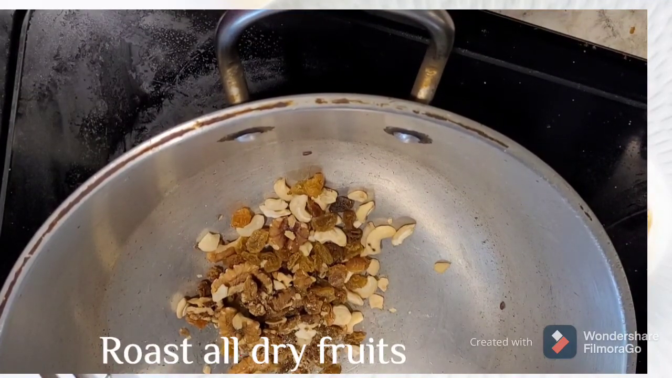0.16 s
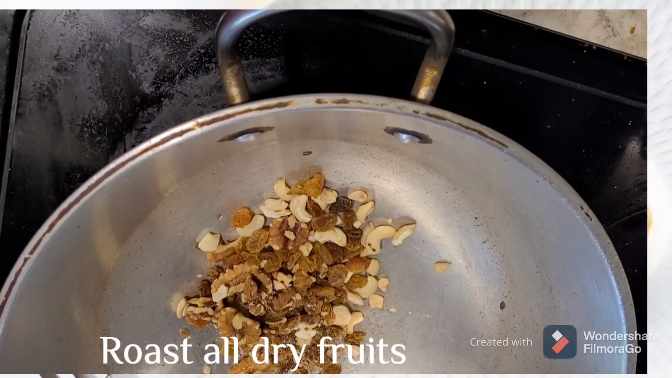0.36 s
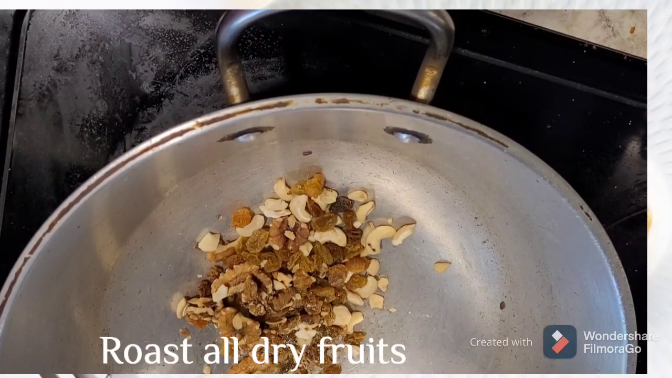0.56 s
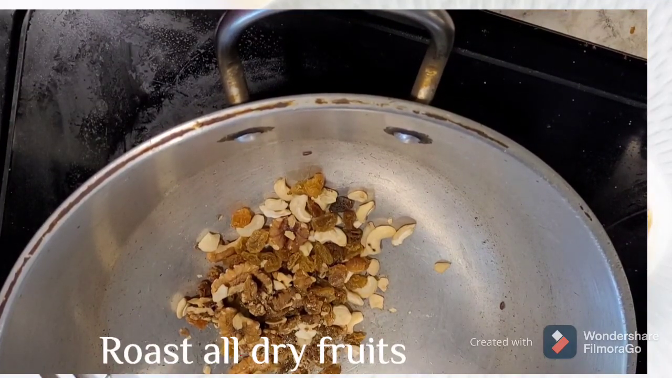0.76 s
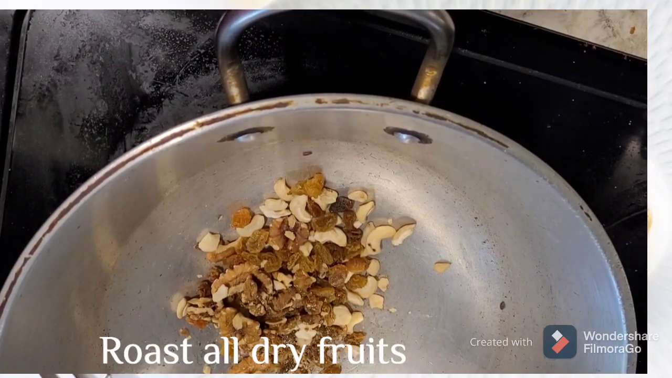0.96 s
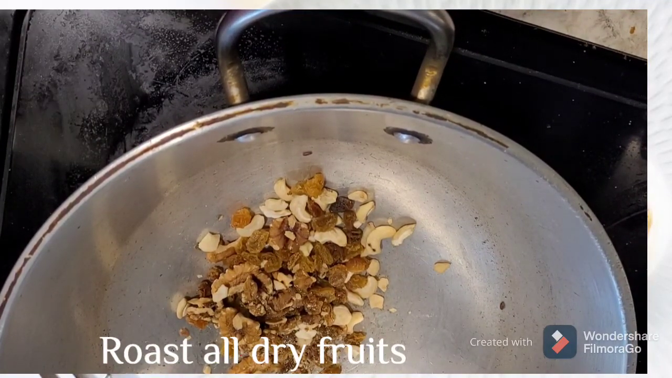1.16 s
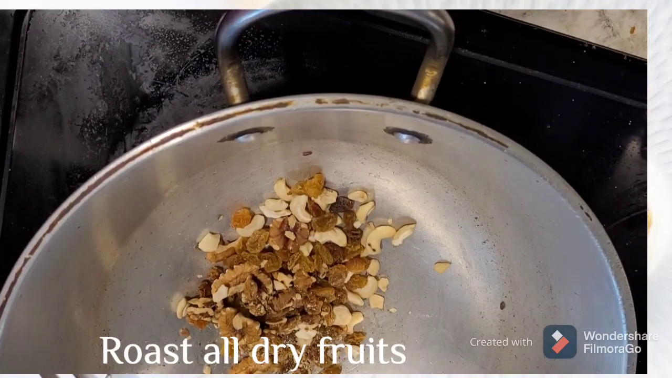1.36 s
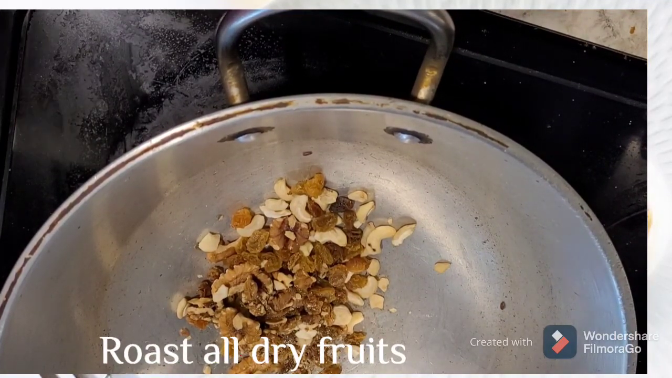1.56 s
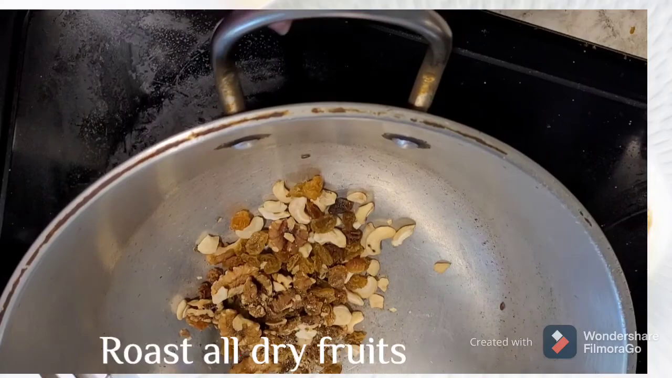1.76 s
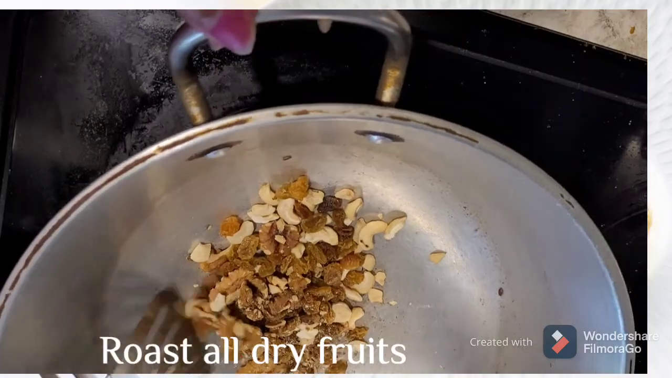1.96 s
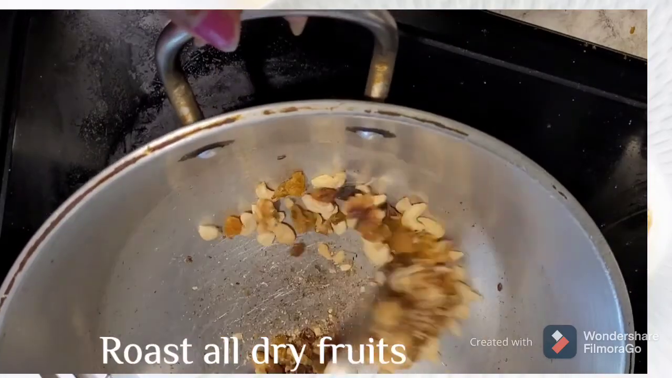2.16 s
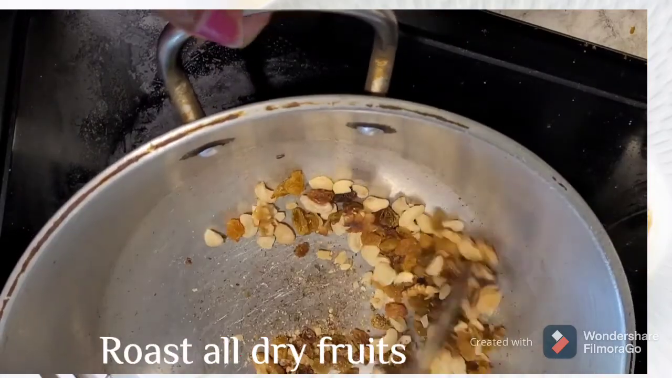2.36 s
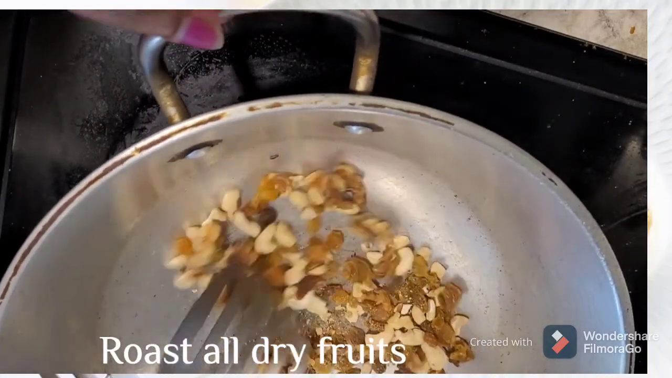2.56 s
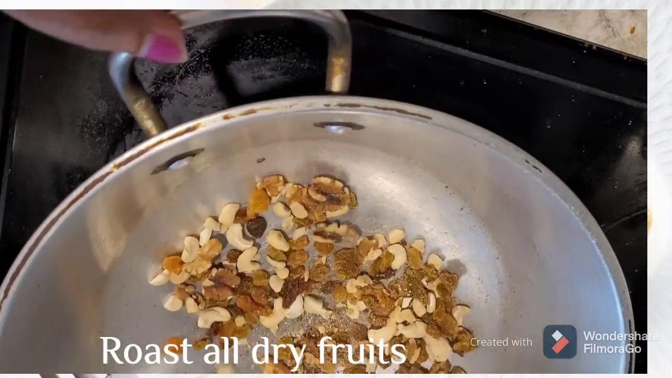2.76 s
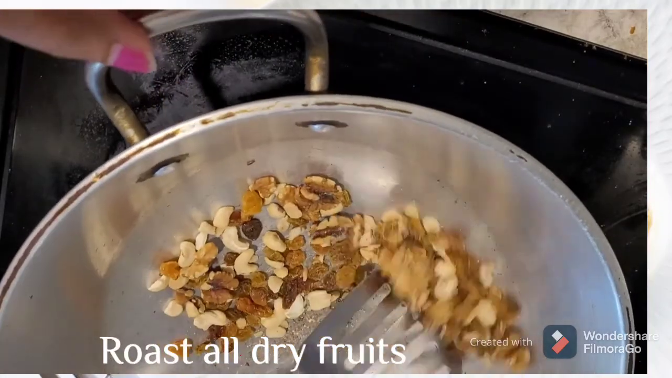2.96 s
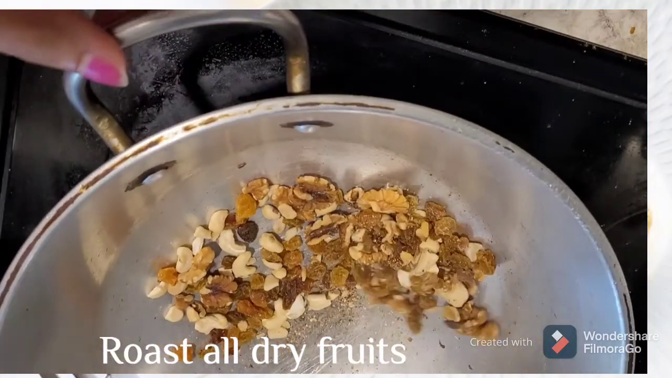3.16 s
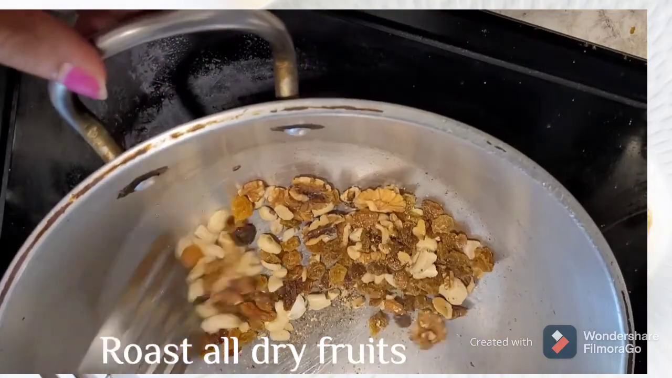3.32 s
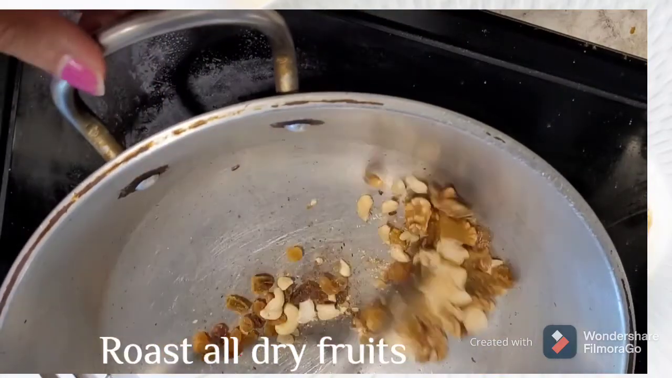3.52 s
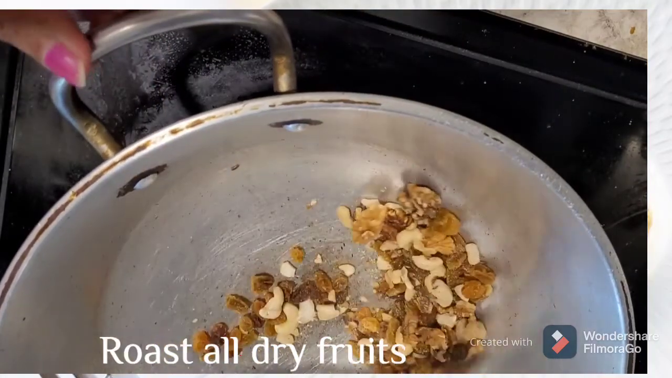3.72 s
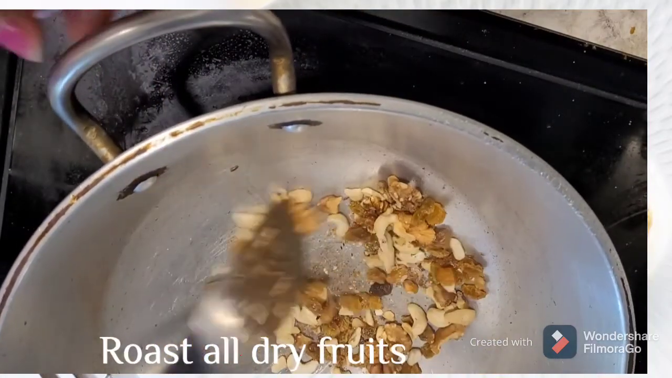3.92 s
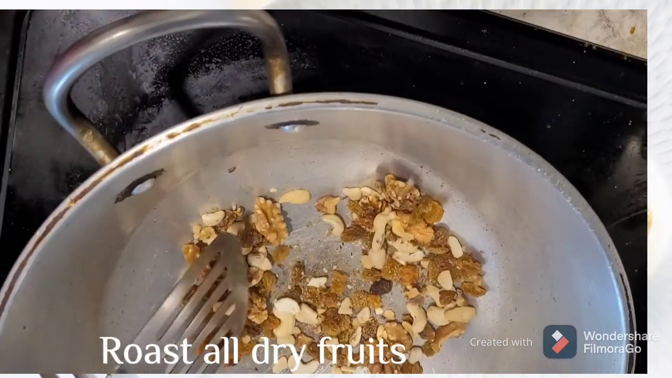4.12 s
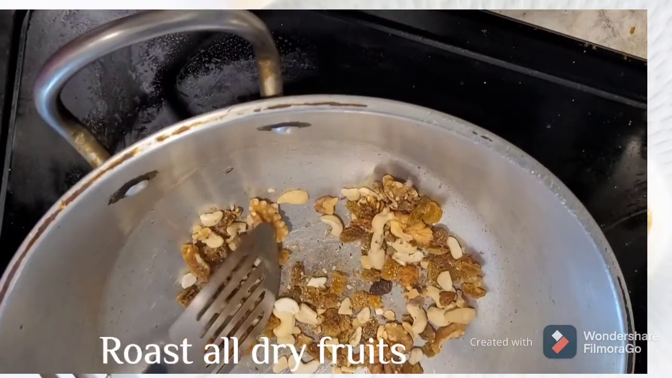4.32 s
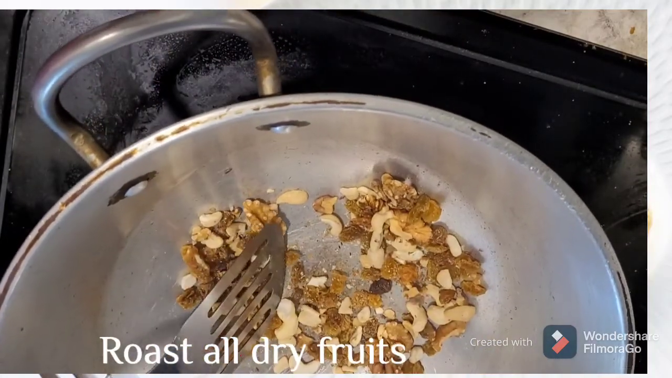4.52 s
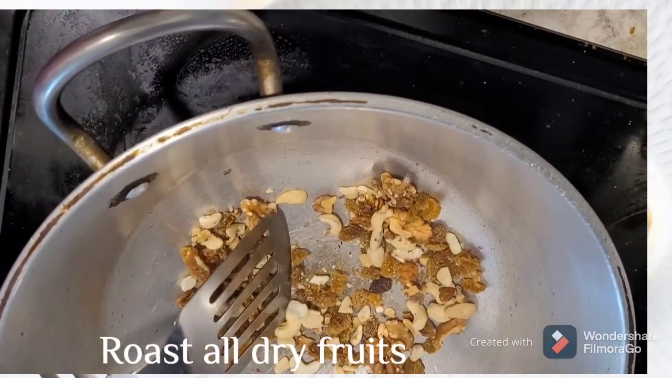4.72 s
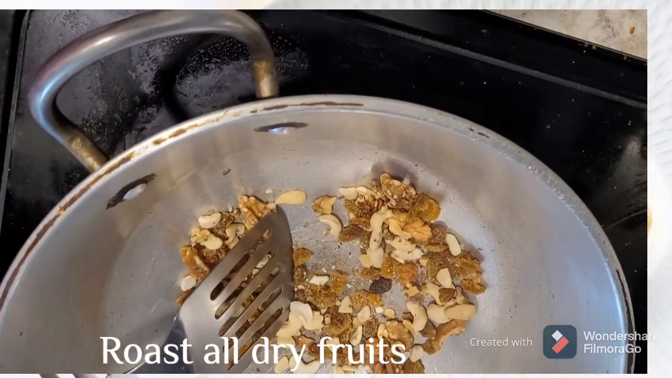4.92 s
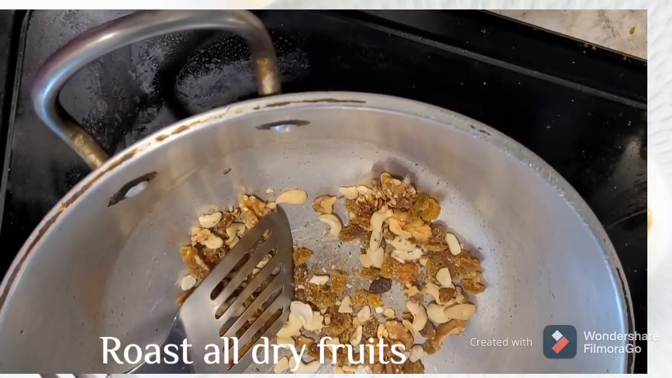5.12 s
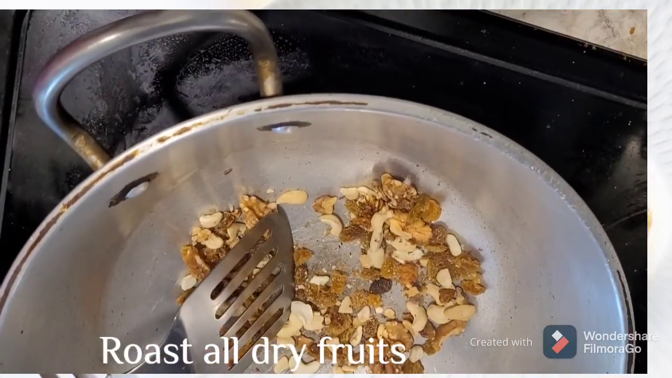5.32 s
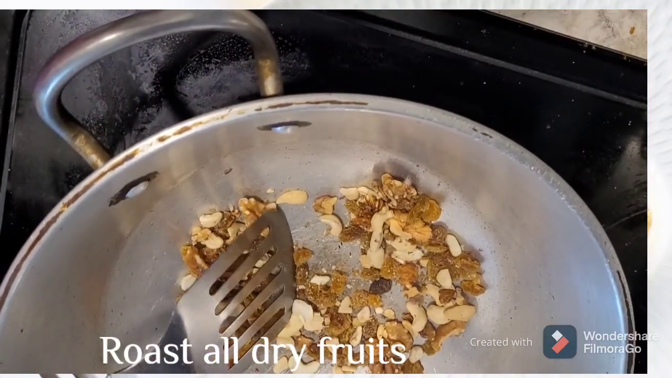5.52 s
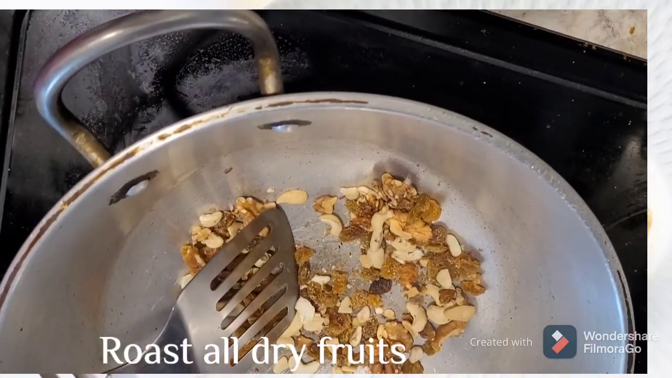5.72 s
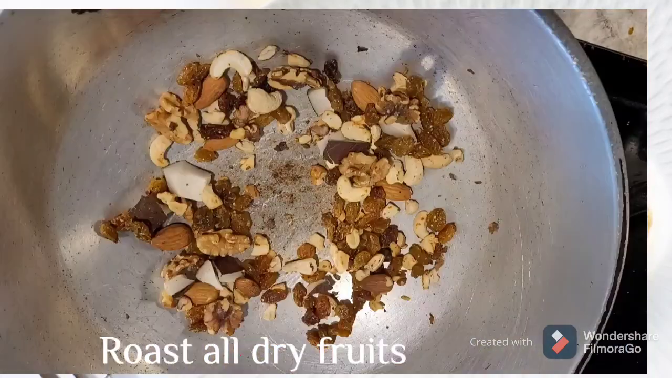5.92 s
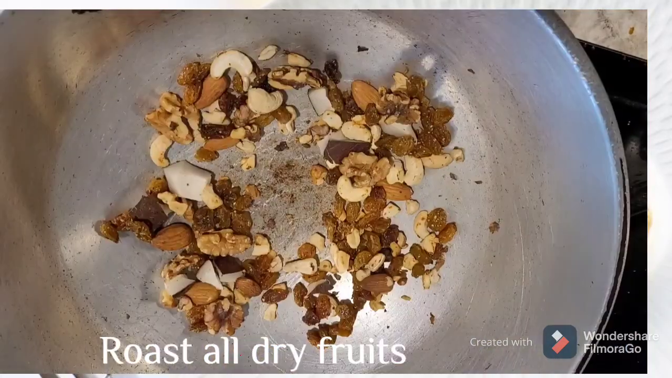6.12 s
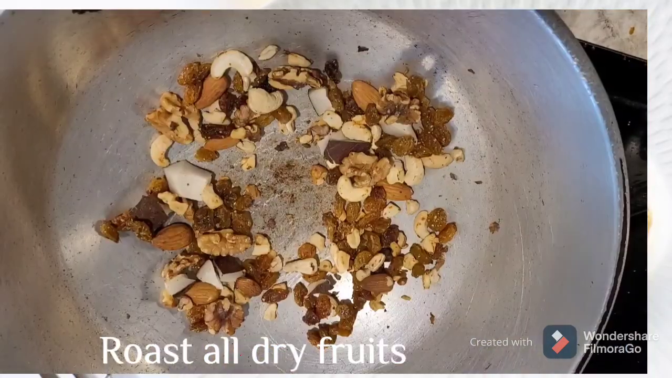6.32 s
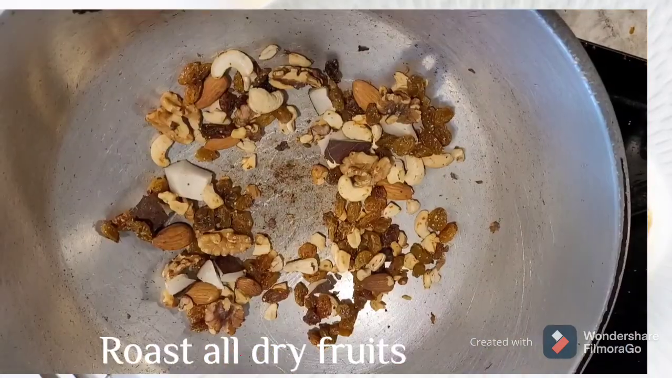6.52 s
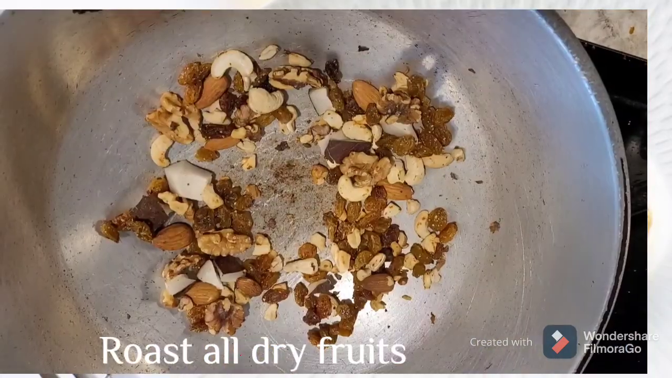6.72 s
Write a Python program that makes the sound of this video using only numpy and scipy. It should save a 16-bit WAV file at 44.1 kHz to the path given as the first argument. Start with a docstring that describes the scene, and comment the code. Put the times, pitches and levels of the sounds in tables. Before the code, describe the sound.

A home kitchen hob, heard close in stereo, with a soft rush of air, a low slightly wavering hum and very faint sizzle throughout. From 0 to 1.3 seconds, a few small groups of dull, hollow, roomy knocks. At 2.0 a metal spatula lands in the steel pan with a loud bright double clank, then a short rasp and squeak; nuts patter softly and the sizzle grows livelier. A softer drag follows from 2.2. At 2.8 another clank and the strongest harsh scrape, with a brief squeal; at 3.25 a third clank, more scraping and gliding squeaks until 3.5. Gentle scraping and light quick taps continue to about 4.1. Isolated dull taps fall at 4.5, 4.8, 5.0 and 5.4. The sizzle fades, with a dry click at 5.25, then tiny close clicks and a soft bump mostly on the right from 6.0 to 6.75.

```python
"""A kitchen hob: nuts and dried fruit roast in a steel pan, over a soft rush of air and a low hum.
A metal spatula gives a few dull knocks as it is picked up, clanks loudly into the pan three times among
lighter taps, and scrapes through the nuts, which patter and sizzle; small dry clicks follow close by.
Blows are rebounding impulses through noise bursts and decaying modes; scrapes are random stick-slip
impulses through the blade's response; squeaks are gliding tones; sizzle and air are coloured noise."""
import sys
import numpy as np
from scipy import signal
from scipy.fft import rfft, irfft
from scipy.io import wavfile

SR = 44100
rng = np.random.default_rng(int(sys.argv[2]) if len(sys.argv) > 2 else 0)


def dump(signal):
    """Clip the signal to [-1, 1] and save it as 16-bit WAV at the path in sys.argv[1]."""
    limited = np.clip(np.atleast_2d(signal).T, -1, 1)
    pcm = np.round(limited * 32767).astype(np.int16)
    wavfile.write(sys.argv[1], SR, pcm)


N = 303452
TIME = np.arange(N) / SR   # s
AGE = TIME[:SR // 2]   # s since a contact, for as long as its sound is computed

# Strokes of the blade through the nuts: (start [s], swell [s], hold [s], friction before trim [dB],
# lower rasp at the end of the push over friction [dB], nuts before trim [dB])
STROKE_LIST = [(2.009, .075, 0.039, -34, 9.5, -45.5), (2.196, 0.22, 0.361, -54, 7, -46),
               (2.786, 0.099, 0.044, -23.5, 0.5, -40), (3.28, 0.11, 0.013, -27, -16, -37.5),
               (3.413, 0.061, 0.0085, -33.5, 7, -56), (3.573, 0.14, 0.328, -59, 11, -43),
               (4.055, 0.016, 0.0039, -52.5, 11, -70)]
# Broad rasp of the blade pressed on steel: (frequency [Hz], relative density [dB per Hz])
RASP_COLOUR = [(200, -21.5), (600, -3.5), (1200, -15.5), (1800, -11.5), (3200, 1), (6000, -1.5),
               (8000, -7.5), (10000, -9.5), (16000, -23)]
# Stereo likeness: (frequency [Hz], left-right correlation [-1 to 1])
STEREO_LIKENESS = [(60, 0.73), (130, 0.99), (300, 0.89), (650, 0.38), (1300, -0.15), (3000, 0.031)]


def from_db(db):
    """Decibels to gain."""
    return 10 ** (np.asarray(db) / 20)


def rms_one(x):
    """Scale to rms 1 over all channels."""
    return x / np.sqrt(np.mean(x ** 2) + 1e-20)


def energy_one(x):
    """Scale to unit energy, averaged over the channels."""
    return rms_one(x) / np.sqrt(x.shape[-1])


def level_over_time(points):
    """Draw a level curve straight between its points, at every sample."""
    seconds, db = np.transpose(points)
    return np.interp(TIME, seconds, db)


def at_hz(points, hz):
    """Read a spectrum on a log-frequency axis."""
    f, value = np.transpose(points)
    return np.interp(np.log(hz + 1e-9), np.log(f), value)


def slope(hz, per_octave, pivot_hz=1000):
    """Tilt in dB above the pivot, flat below it; a harder contact lifts the treble."""
    return per_octave * np.log2(np.maximum(hz, pivot_hz) / pivot_hz)


def dying(t60):
    """Exponential decay that falls by 60 dB in t60 seconds."""
    return np.exp(-np.log(1000) * AGE / t60)


def drift(rate_hz):
    """Smooth random wander of rms 1, made by low-passing noise."""
    hz = np.fft.rfftfreq(N, 1 / SR)
    return rms_one(irfft(rfft(rng.standard_normal(N)) / (1 + (hz / rate_hz) ** 2), N))


def noise(colour, size, weight=np.zeros_like):
    """Coloured stereo noise, its channels much alike in the bass and nearly unrelated in the treble."""
    hz = np.fft.rfftfreq(size, 1 / SR)
    mid, side = rfft(rng.standard_normal((2, size)))
    alike = at_hz(STEREO_LIKENESS, hz)
    both = np.sqrt(1 + alike) * mid + np.sqrt(1 - alike) * side * [[1], [-1]]
    return rms_one(irfft(both * from_db(at_hz(colour, hz) + weight(hz)), size))


def ring(modes, weight=np.zeros_like, detune=0):
    """Decaying modes, with new random strengths at every contact and a phase gap between the channels."""
    out = 0
    for hz, db, t60 in modes:
        # the less alike the channels are at this pitch, the further apart in phase
        apart = np.arccos(at_hz(STEREO_LIKENESS, hz)) * rng.choice([-.5, .5])
        pitch = hz * (1 + detune * rng.standard_normal())
        swing = np.exp(2j * np.pi * (pitch * AGE + rng.random())) * dying(t60)
        gain = from_db(db + weight(hz) + 2 * rng.standard_normal())
        out = out + gain * np.real(swing * np.exp(1j * apart * np.array([[1], [-1]])))
    return energy_one(out)


def wash(colour, crack_t60, tail_db, tail_t60, weight=np.zeros_like):
    """A contact's crack in noise, then the tail of crowded modes and kitchen walls."""
    envelope = dying(crack_t60) + from_db(tail_db) * dying(tail_t60)
    return energy_one(noise(colour, len(AGE), weight) * envelope)


def grains(per_s, spread_db):
    """Tiny contacts at random moments, of uneven size; rms 1."""
    sizes = from_db(spread_db * np.minimum(rng.exponential(1, N), 4))
    signed = sizes * rng.choice([-1, 1], N)
    return rms_one(signed * (rng.random(N) < per_s / SR))


def chatter(length, count=7):
    """A first contact and its quick, weakening rebounds."""
    force = np.zeros(int(length * SR) + 2)
    when = np.append(0, (np.arange(count) + rng.random(count)) / count)
    force[(when * (len(force) - 1)).astype(int)] = np.exp(-when) * rng.choice([-1, 1], count + 1)
    return energy_one(force)


def excite(force, response):
    """Play a force through a stereo response."""
    return signal.fftconvolve(force[None], response, axes=1)[:, :N]


def add(out, s, sound):
    """Mix a sound in at a time in seconds."""
    start = int(s * SR)
    out[:, start:start + sound.shape[1]] += sound[:, :N - start]


def contact(bright, spot_hz, spot_db=6):
    """Weight in dB of each frequency in one blow: its hardness, and the modes near the spot struck."""
    def weight(hz):
        octaves_off = np.log2((hz + 1) / spot_hz)
        return slope(hz, bright, pivot_hz=3000) + spot_db * np.exp(-(octaves_off / .18) ** 2)
    return weight


def blow(db, length, crack, modes):
    """One blow: the crack repeats with each rebound while the modes swell and ring on."""
    swell = 1 - np.exp(-2 * AGE / length)
    rebounds = excite(chatter(length), crack)[:, :len(AGE)]
    return from_db(db) * np.sqrt(SR) * (rebounds + modes * swell)


def strikes(ring_db=-1, low_ring_db=0, level_db=-1, muffle=0.8):
    """The spatula lands: the steel clangs, the wall knocks and the whole pan gives a low thud."""
    # Spatula meets pan: (time [s], clang before trim [dB], hollow knock before trim [dB],
    # brightness [dB per octave], frequency favoured by the spot struck [Hz], chatter length [s])
    strike_list = [(1.982, -30.5, -52.5, -1, 4900, 0.0082), (1.993, -33.5, -53.5, -3.5, 4800, 0.0084),
                   (2.072, -49.5, -64, -15, 4600, 0.0068), (2.299, -54, -72, -5.5, 6360, 0.023),
                   (2.778, -36.5, -58, -2, 6700, 0.0091), (3.2452, -33.5, -57, -4, 6250, 0.0087),
                   (3.693, -56, -65, -12, 4670, .004), (3.73, -51, -63, -7, 5300, .012),
                   (3.794, -52, -72, -3.5, 6050, 0.0055), (3.827, -57.5, -82, -8, 7000, 0.0039),
                   (3.861, -55, -78, -6.5, 6660, .015), (4.084, -58.5, -82, -15, 3180, 0.0028),
                   (4.523, -53.5, -52.5, -10, 4760, 0.0093), (4.796, -58, -57, -19, 5000, .008),
                   (5.028, -50.5, -55, -8, 5000, .005), (5.412, -56, -62, -10, 4800, .003)]
    # Bright ring of the steel: (frequency [Hz], relative level before chance [dB], t60 [s])
    pan_modes = [(2322, -6.5, 0.19), (2430, -41, 0.083), (3170, -16, 0.34), (3500, -16.5, 0.34),
                 (4620, 11, 0.083), (4800, -7.5, 0.09), (4958, -17, 0.13), (5090, -23.5, 0.22),
                 (5380, -22.5, .18), (5930, 2, 0.15), (6250, -11.5, .16), (6480, -34.5, .13),
                 (6830, 8.5, 0.11), (7080, 7, 0.12), (7580, -2, .22), (7843, 7, 0.099), (8550, -8, 0.3),
                 (8960, -13.5, 0.31), (9250, -38.5, 0.11), (9700, -35, 0.12), (10800, 10.5, 0.07)]
    # Dense short-lived modes of the steel: (frequency [Hz], relative density [dB per Hz])
    clank_colour = [(600, -19), (1900, -18.5), (2400, -9), (3000, -9.5), (3900, -14.5), (4700, 5.5),
                    (5300, 1), (6000, 0.5), (7700, 2), (10000, -3), (16000, -7.5)]
    # Hollow knock of the pan's wall: (frequency [Hz], relative density [dB per Hz])
    hollow_colour = [(300, -17), (620, -1), (800, -23.5), (1120, 9.5), (1350, -1.5), (1700, 0),
                     (2000, -9.5), (3000, -32.5), (5000, -25), (16000, -47)]
    # Low modes of the jolted pan: (frequency [Hz], relative level before chance [dB], t60 [s])
    thud_modes = [(142.7, 1, 0.57), (227, -1, 0.31), (290, -11, 0.051), (335, -10.5, 0.18)]
    # Dull body of the jolted pan: (frequency [Hz], relative density [dB per Hz])
    thud_colour = [(90, -22), (140, 4.5), (230, -7.5), (330, 5), (450, -15), (620, -2), (900, -13),
                   (4000, -45)]
    # thud over knock at a middling clang, and its growth in dB per dB of clang
    thud_over_knock_db, middling_clang_db, thud_growth = 0.5, -47.5, 0.29
    out = np.zeros((2, N))
    for s, clang_db, knock_db, bright, spot_hz, length in strike_list:
        # a heavier blow jolts the whole pan more
        thud_db = knock_db + thud_over_knock_db + thud_growth * (clang_db - middling_clang_db)
        weight = contact(bright, spot_hz)
        crack = wash(clank_colour, crack_t60=0.023, tail_db=-12, tail_t60=0.33, weight=weight)
        # a soft landing among the nuts also damps the ring
        steel = from_db(ring_db + muffle * min(bright, 0)) * ring(pan_modes, weight)
        add(out, s, blow(clang_db + level_db, length, crack, steel))
        wall = wash(hollow_colour, crack_t60=.04, tail_db=-8, tail_t60=.22)
        add(out, s, blow(knock_db + level_db, length, wall, 0))
        body = wash(thud_colour, crack_t60=0.079, tail_db=1.0, tail_t60=0.51)
        low_ring = from_db(low_ring_db) * ring(thud_modes)
        add(out, s, blow(thud_db + level_db, length, body, low_ring))
    return out


def stroke(start, swell, hold, power, release_db_per_s):
    """Gain of one push: it swells from almost nothing, holds and dies away."""
    age = TIME - start
    rise = np.clip(age / swell, 1e-6, 1) ** power
    return rise * from_db(-release_db_per_s * np.maximum(age - swell - hold, 0))


def blade_pressure():
    """Friction of all strokes, and that of their lower rasp, which grows as the blade climbs the wall."""
    bite_growth_db = 11.5   # over one stroke
    friction, bite = 0, 0
    for start, swell, hold, db, bite_db, _ in STROKE_LIST:
        push = from_db(db) * stroke(start, swell, hold, power=2, release_db_per_s=230)
        to_go = np.clip(1 - (TIME - start) / (swell + hold), 0, 1)
        friction = np.hypot(friction, push)
        bite = np.hypot(bite, push * from_db(bite_db - bite_growth_db * to_go))
    return friction, bite


def scraping(ring_db=3, level_db=-3, split_hz=4000, wander_db=9, count=4):
    """The edge sticks and slips over the steel; as it travels, one touching spot takes over from another."""
    # The blade pressed on steel: (frequency before detuning [Hz], relative level before chance [dB], t60 [s])
    blade_modes = [(2115, -11, 0.11), (2970, -1, 0.033), (3400, -5.5, 0.051), (3530, -2.5, 0.083),
                   (3800, -25, 0.066), (4507, 2.5, 0.077), (4620, -5.5, 0.17), (4740, -5, 0.11),
                   (5725, 4.5, 0.048), (5970, -3, 0.061), (7160, -11.5, 0.0705), (7260, 6.5, 0.0213),
                   (7840, -1.5, 0.066), (8540, -12, .12)]
    friction, bite = blade_pressure()
    share = np.array([from_db(wander_db * drift(rate_hz=11.5)) for _ in range(count)])
    share = share / np.sqrt(np.sum(share ** 2, axis=0))   # the spots share a constant power
    push = from_db(level_db + 0.6 * drift(rate_hz=61))
    low_pass = signal.butter(4, split_hz, fs=SR, output="sos")
    out = 0
    for spot in share:
        slips = grains(per_s=650, spread_db=3.6) * push * spot
        low = signal.sosfiltfilt(low_pass, slips)
        force = (slips - low) * friction + low * bite
        # each spot loads the blade a little differently
        rasp = wash(RASP_COLOUR, crack_t60=.018, tail_db=-13, tail_t60=.23)
        blade = rasp + from_db(ring_db) * ring(blade_modes, detune=0.0137)
        out = out + excite(force, blade)
    return out


def squeaks(jitter=0.0204, overtone_db=-7, level_db=-1):
    """The edge sticks and sings: slips fall into step in a rough, gliding tone with overtones."""
    # Singing moments: (start [s], length [s], start pitch before jitter [Hz],
    # end pitch before jitter [Hz], level before trim [dB])
    squeak_list = [(2.057, 0.064, 4700, 4445, -40.5), (2.885, 0.037, 5980, 5590, -35),
                   (2.93, 0.043, 3410, 3470, -34), (3.327, 0.068, 2390, 2270, -47),
                   (3.36, 0.068, 1434, 1695, -44.5), (3.388, .05, 1770, 2280, -48),
                   (3.435, 0.093, 3334, 3554, -44), (4.082, 0.052, 3230, 3170, -50)]
    force = np.zeros(N)
    waver = 1 + jitter * drift(rate_hz=226)
    for s, length, start_hz, end_hz, db in squeak_list:
        span = np.flatnonzero((TIME >= s) & (TIME < s + length))
        pitch = np.linspace(start_hz, end_hz, len(span)) * waver[span]
        phase = 2 * np.pi * np.cumsum(pitch) / SR
        tone = sum(from_db(overtone_db * k) * np.sin((k + 1) * phase) for k in range(4))
        swell = np.sin(np.linspace(0, np.pi, len(span)))
        force[span] += from_db(db + level_db) * np.sqrt(2) * tone * swell
    rasp = wash(RASP_COLOUR, crack_t60=.02, tail_db=-20, tail_t60=0.29)
    return force + from_db(1.5) * excite(force, rasp)


def nuts(level_db=-1):
    """Pushed nuts patter softly on pan and each other, moving at the first push and settling slowly."""
    # Soft contacts heard through the pan: (frequency [Hz], relative density [dB per Hz])
    nut_colour = [(105, -27), (145, 9.5), (190, -29.5), (300, 5), (500, -9), (800, -3), (1150, 1),
                  (1600, -10), (3200, -18.5), (7000, -9), (16000, -44.5)]
    pushes = []
    for start, swell, *_, db in STROKE_LIST:
        motion = stroke(start, swell, hold=0, power=1.4, release_db_per_s=61)
        pushes.append(from_db(db + level_db) * motion)
    tumble = np.hypot.reduce(pushes)
    patter = grains(per_s=220, spread_db=3.6)
    touch = wash(nut_colour, crack_t60=.025, tail_db=-14, tail_t60=.25)
    return excite(patter * tumble, touch)


def knocks(level_db=-1, count=3):
    """Dull, hollow clatter beside the pan, a little way off, with much room in it."""
    # Clatters of several knocks: (time [s], gap [s], first knock before trim [dB],
    # growth per knock [dB], hollow ring before trim [dB], brightness [dB per octave])
    knock_list = [(.002, 0.013, -60.5, -8, -68.5, 4), (.243, 0.014, -54.5, 3.5, -45, 3),
                  (0.889, .034, -58.5, -1, -56, 2.5), (1.138, 0.023, -61.5, 2.5, -61, -3)]
    # Hollow ring: (frequency [Hz], relative level before chance [dB], t60 [s])
    knock_modes = [(229.6, 1.5, 0.16), (426, -6, 0.18), (467, 3.5, 0.089), (529, 3, 0.17),
                   (823, -8.5, 0.25), (1105, -12.5, 0.31), (1807, -17.5, 0.24)]
    # Dull crack: (frequency [Hz], relative density [dB per Hz])
    knock_colour = [(120, -11), (250, -6), (500, -0.5), (750, -8), (1800, -11), (3500, -22), (6000, -29.5),
                    (16000, -55)]
    first_length, longer_each = .004, .013   # s; each further knock rattles longer
    out = np.zeros((2, N))
    for s, gap, first_db, growth_db, ring_db, bright in knock_list:
        hardness = lambda hz: slope(hz, bright)
        for k in range(count):
            db = first_db + k * growth_db
            length = first_length + k * longer_each
            crack = wash(knock_colour, crack_t60=0.091, tail_db=-9.5, tail_t60=0.55, weight=hardness)
            # the ring keeps its own level whatever the knock's
            hollow = from_db(ring_db - db) * ring(knock_modes, hardness)
            add(out, s + k * gap, blow(db + level_db, length, crack, hollow))
    return out


def clicks(level_db=-2):
    """Dry clicks and a soft bump close by, as band-passed noise bursts too near for any room."""
    # Clicks: (time [s], level before trim [dB], pitch that sets the band [Hz],
    # quarter of the burst's t60 [s], left minus right [dB])
    click_list = [(5.245, -66, 3020, 0.0013, 3), (6.003, -72.5, 1380, 0.0022, -14),
                  (6.170, -76.5, 3700, 0.0014, 16.5), (6.35, -62, 1004, 0.0012, -16),
                  (6.373, -66.5, 2170, 0.0049, -10), (6.383, -71.5, 4200, 0.0055, -13),
                  (6.399, -56.5, 90, 0.012, -11), (6.413, -68, 2180, 0.018, -19.5),
                  (6.737, -64.5, 1150, .014, -21)]
    out = np.zeros((2, N))
    for s, db, hz, length, pan_db in click_list:
        shared = rng.standard_normal(len(AGE))
        burst = (shared + rng.standard_normal((2, len(AGE)))) * dying(4 * length)
        band = signal.butter(2, [hz / 3, hz * np.sqrt(3)], "band", fs=SR, output="sos")
        gain = from_db(db + level_db + pan_db * np.array([[.5], [-.5]]))
        add(out, s, gain * np.sqrt(SR) * energy_one(signal.sosfilt(band, burst + 1e-18)))
    return out


def sizzle(crackle_db=-6, flicker_db=1):
    """Fat sizzles on the steel: a flickering hiss with minute pops, livelier once the nuts are turned."""
    # Hiss level before flicker: (time [s], level [dB])
    sizzle_level = [(0, -60.5), (1.95, -63.5), (2.3, -50), (4.4, -50.5), (5.9, -58), (6.4, -58.5),
                    (6.45, -66)]
    # Hiss and pops: (frequency [Hz], relative density [dB per Hz])
    sizzle_colour = [(1500, -11), (3500, -3), (7000, 0), (9500, -2.5), (16000, -3)]
    level_db = level_over_time(sizzle_level)
    pop = wash(sizzle_colour, crack_t60=0.002, tail_db=-34.0, tail_t60=.15)
    pops = excite(grains(per_s=1100, spread_db=6), pop)
    flicker = from_db(level_db + flicker_db * drift(rate_hz=15))
    return flicker * (noise(sizzle_colour, N) + from_db(crackle_db) * pops)


def kitchen(hum_hz=59.2, hum_db=-49):
    """A soft rush of air as coloured noise, and a low hum slightly wavering in pitch and level."""
    # Rush of air: (frequency [Hz], relative density [dB per Hz])
    room_colour = [(20, -23), (45, -5.5), (62, 1.5), (85, -12.5), (115, -12), (140, 2), (180, -18.5),
                   (232, 2), (310, -2), (450, -9.5), (800, -15), (1500, -21.5), (3000, -27.5),
                   (16000, -53.5)]
    # Level of the rush: (time [s], level [dB])
    room_level = [(0, -48), (.7, -50.5), (4.8, -48), (6.88, -50.5)]
    pitch = hum_hz + 0.35 * drift(rate_hz=1.35)
    hum = np.sqrt(2) * np.sin(2 * np.pi * np.cumsum(pitch) / SR)
    air = from_db(level_over_time(room_level)) * noise(room_colour, N)
    return air + from_db(hum_db + 0.37 * drift(rate_hz=4)) * hum


def scene():
    """Everything at the hob."""
    return strikes() + scraping() + squeaks() + nuts() + knocks() + clicks() + sizzle() + kitchen()


def record(dry):
    """The two channels colour the sound differently; the top is cut steeply."""
    # Channel balance: (frequency [Hz], left minus right [dB])
    channel_balance = [(200, 1), (380, -4.5), (700, 2), (1300, -2), (2400, 4), (4400, 0.5), (8000, -2.5),
                       (14000, 6)]
    hz = np.fft.rfftfreq(N, 1 / SR)
    channel_gain = from_db(at_hz(channel_balance, hz) * np.array([[.5], [-.5]]))
    top_cut = signal.ellip(12, .1, 80, 15900, fs=SR, output="sos")   # order, ripple dB, stop dB, Hz
    return signal.sosfilt(top_cut, irfft(rfft(dry) * channel_gain, N))


dry = scene()
out = record(dry)
dump(out)
```